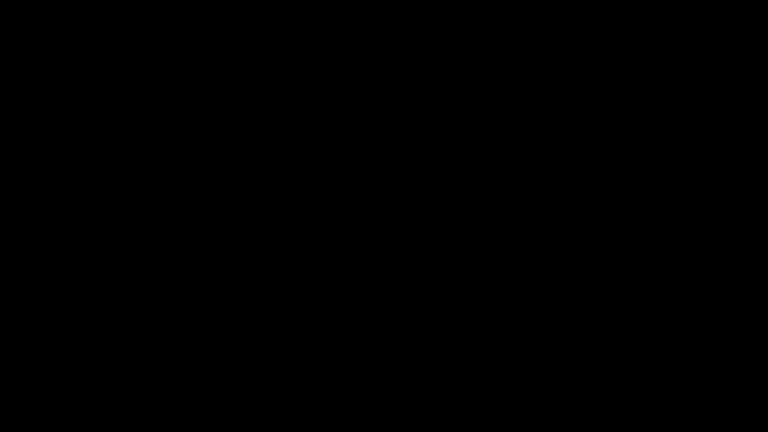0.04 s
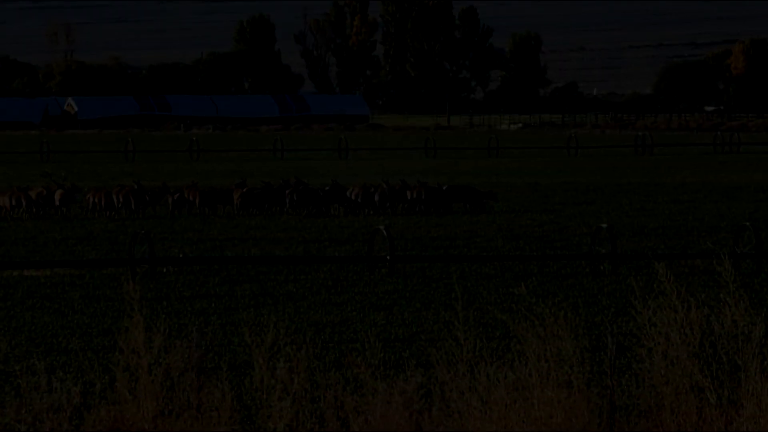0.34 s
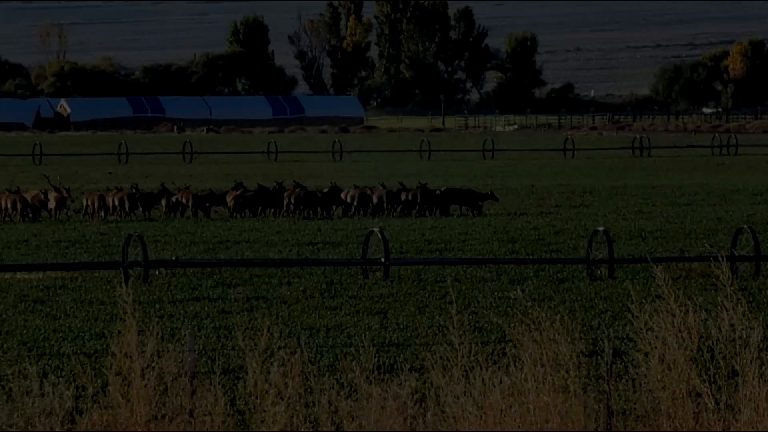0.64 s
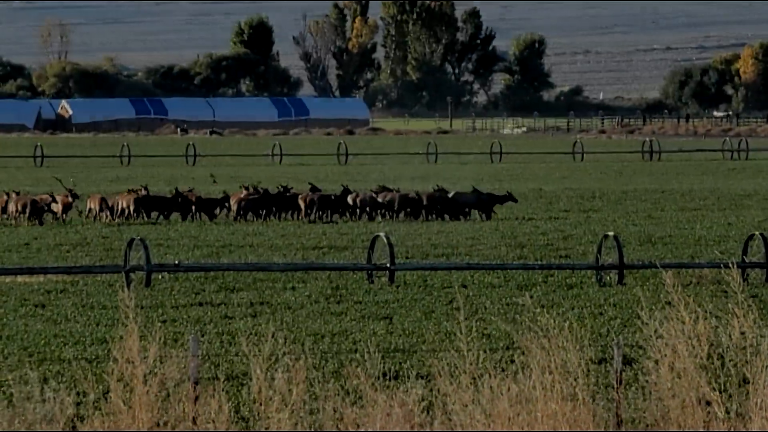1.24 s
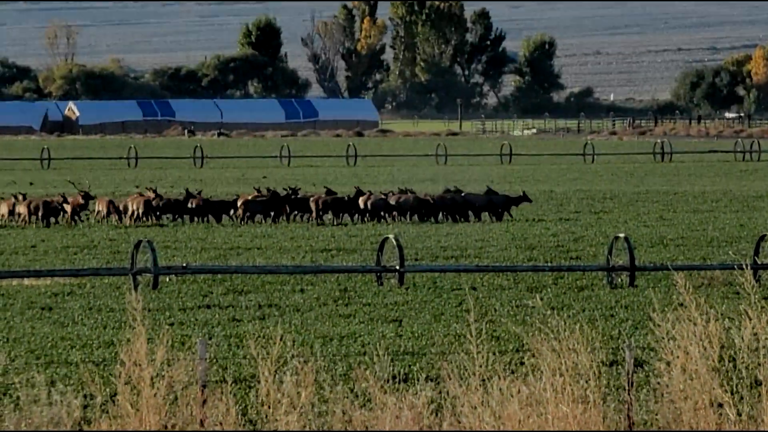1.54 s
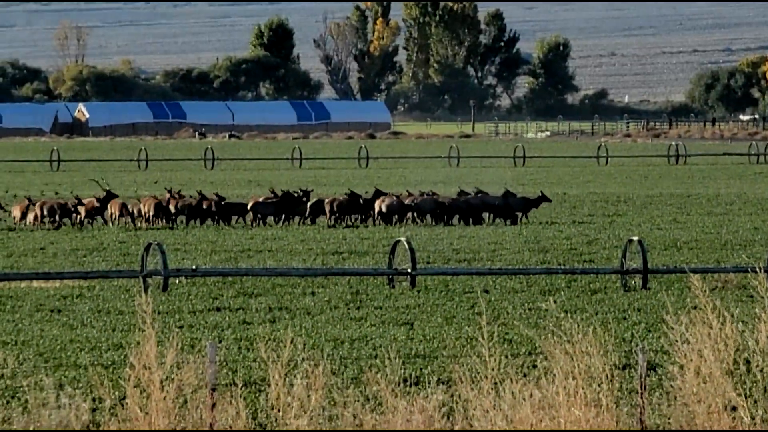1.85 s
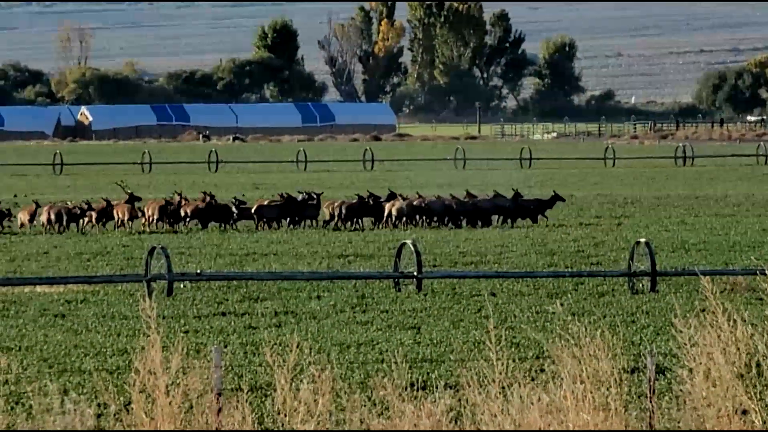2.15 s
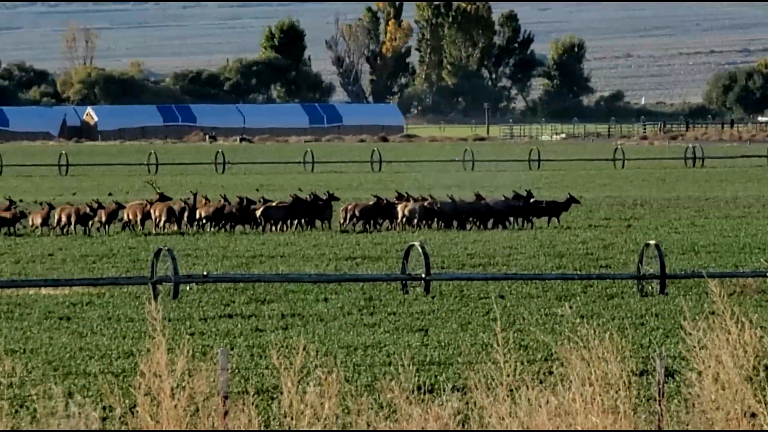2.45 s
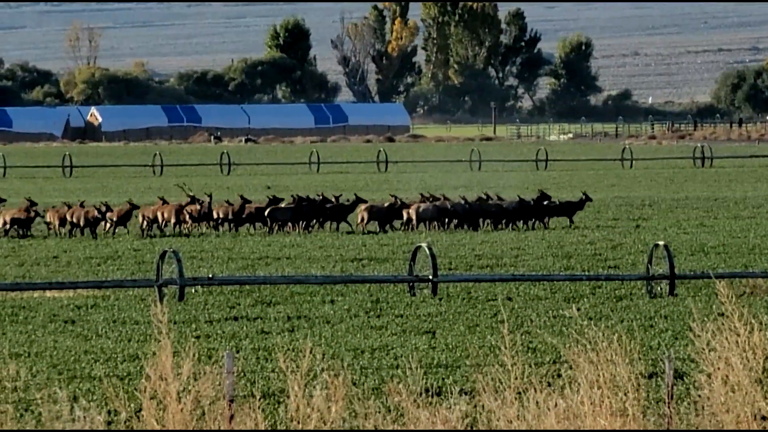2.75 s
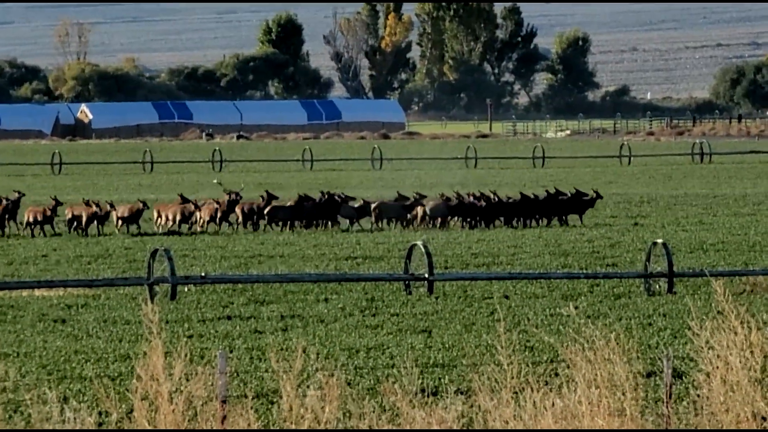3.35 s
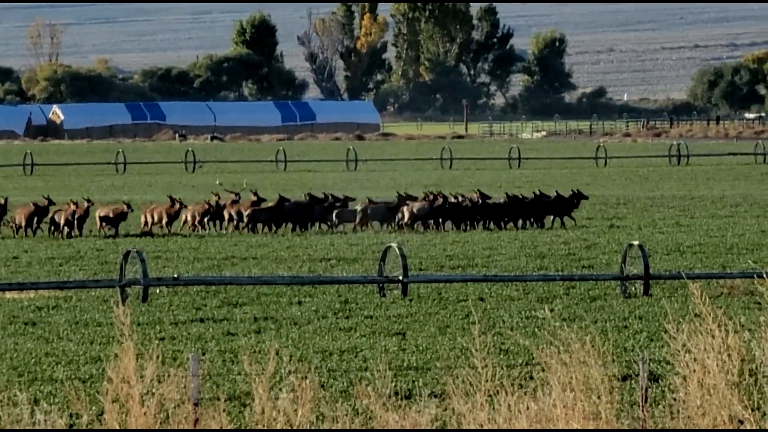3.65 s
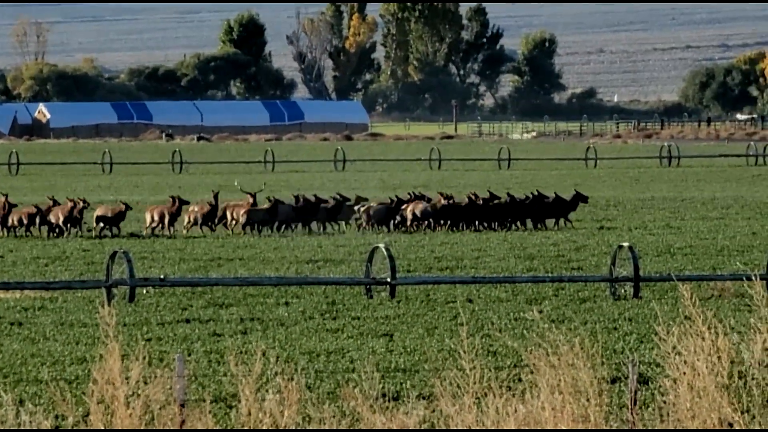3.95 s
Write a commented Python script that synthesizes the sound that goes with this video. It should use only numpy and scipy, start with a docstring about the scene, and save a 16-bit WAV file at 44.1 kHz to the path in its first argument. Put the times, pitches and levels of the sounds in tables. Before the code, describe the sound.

A distant idling engine fades in and hums steadily outdoors, mixed with low wind and a soft hiss. Near the start the microphone is bumped softly twice and gives a few faint clicks and rustles.

```python
"""An open field, with an engine idling some way off in light wind.
The harmonics of the engine's cycle make a low throb, and its narrow noise bands a wavering drone.
A rumble of wind and exhaust and a soft rush pulse with the firings, under a hiss and a thin whine.
Handling draws clicks and faint rustles from the camera's resonant body, and bumps it twice.
The whole scene fades in at the start."""
import sys
import numpy as np
from scipy import signal
from scipy.fft import rfft, irfft
from scipy.io import wavfile
from scipy.ndimage import uniform_filter1d

SR = 44100
rng = np.random.default_rng(int(sys.argv[2]) if len(sys.argv) > 2 else 0)


def file_out(sig):
    """Save sig as 16-bit WAV at sys.argv[1]."""
    # one column per channel
    cols = np.atleast_2d(sig).T
    # limit, then scale
    lim = np.clip(cols, -1, 1)
    pcm = np.round(lim * 32767).astype(np.int16)
    wavfile.write(sys.argv[1], SR, pcm)


N = 176400

CYCLE_HZ, FIRINGS_PER_CYCLE = 6.21, 6
SPEED_WANDER, WANDER_HZ = 0.0036, 1.38  # rms fraction of the engine's speed, bandwidth of its drift


def amp(db):
    """Amplitude ratio of a level in decibels."""
    return 10 ** (np.asarray(db) / 20)


def unit(x):
    """Normalisation to rms 1."""
    return x / np.sqrt(np.mean(x ** 2) + 1e-30)


def read(points, hz):
    """Interpolation of a table on a logarithmic frequency axis."""
    f, value = np.transpose(points)
    return np.interp(np.log(hz + 1), np.log(f + 1), value)


def envelope(points):
    """Gain over time, interpolated in decibels between rows of t/s, level/dB."""
    return amp(np.interp(np.arange(N) / SR, *np.transpose(points)))


def add(mix, start_s, sound):
    """Superposition of a sound on the mix from a given time."""
    part = mix[:, round(start_s * SR):][:, :sound.shape[-1]]
    part += sound[..., :part.shape[1]]


def drift(rate_hz):
    """Slow random fluctuation: low-passed Gaussian noise of rms 1."""
    hz = np.fft.rfftfreq(N, 1 / SR)
    lowpass = np.exp(-(hz / rate_hz) ** 2) * (hz > 0)
    return unit(irfft(rfft(rng.standard_normal(N)) * lowpass, N))


def pair(a, b, correlation):
    """Sum and difference of two independent signals give a left and right of set correlation."""
    c = np.clip(correlation, -1, 1)
    mid, side = a * np.sqrt((1 + c) / 2), b * np.sqrt((1 - c) / 2)
    return np.array([mid + side, mid - side])


def noise_field(density, patch_db):
    """Partially coherent noise at two microphones, its level varying in time-frequency patches."""
    # likeness of left and right: f/Hz, coherence
    coherence = [(40, 0.86), (160, 1), (300, 0.75), (450, 0.75), (600, 0.42), (860, 0.19), (1120, 0.06),
                 (1320, 0), (1480, 0.36), (1720, .78), (2000, .58), (2200, 0.058)]
    # left minus right: f/Hz, level/dB
    balance = [(250, 0), (400, -2.5), (600, -0.5), (930, -7), (1150, 1), (1470, 2.5), (1800, 3), (2200, 0),
               (2900, 2.5), (4150, -3.5), (5300, 9), (6150, -4.5), (7300, 8), (8500, 1), (10200, 1.5),
               (12500, -0.5)]
    # later arrival on the left: f/Hz, phase/rad
    lag = [(480, 0), (750, 0.24), (900, 1.8), (1340, 1.9), (1460, 0.82), (1560, -.4), (1700, -1.56),
           (2000, -1.94)]
    hz = np.fft.rfftfreq(N, 1 / SR)
    cells = signal.stft(rng.standard_normal((2, N)), nperseg=512)[2]
    patches = uniform_filter1d(rng.standard_normal(cells.shape[1:]), size=12, axis=1)  # along time
    patches = unit(uniform_filter1d(patches, size=6, axis=0))  # along frequency
    a, b = rfft(signal.istft(cells * amp(patch_db * patches))[1][:, :N])
    side_gain = amp(np.outer([.5, -.5], read(balance, hz)))
    side_phase = np.exp(-1j * np.outer([.5, -.5], read(lag, hz)))
    spectrum = pair(a, b, read(coherence, hz)) * side_gain * side_phase * amp(read(density, hz))
    return irfft(spectrum, N) * np.sqrt(SR / 2)


def engine_throb(cycles):
    """A periodic source radiates harmonics of its cycle; each wavers in level on its way."""
    # engine orders: multiple of the cycle rate, level/dB
    orders = [(3, -50), (4, -55.5), (6, -48), (8, -59.5), (12, -58), (15, -66), (18, -54), (20, -56),
              (21, -60), (22, -55.5), (24, -57.5), (27, -59.5)]
    # swell of all the orders: t/s, level/dB
    swell = [(0, 0.5), (1.1, -2.5), (1.95, 1.5), (2.5, -1.1), (3.9, 1)]
    waver_db, lag_rad = 1.5, np.array([[0.23], [0]])  # the left lags
    out = np.zeros((2, N))
    for order, db in orders:
        peak = np.sqrt(2) * amp(db + waver_db * drift(WANDER_HZ))
        out += peak * np.sin(2 * np.pi * (order * cycles + rng.random()) - lag_rad)
    return out * envelope(swell)


def engine_drone():
    """Narrow-band noise is heard as unsteady tones; these swell and sink together."""
    # bands of the drone: f/Hz, width/Hz, level/dB, left-right correlation
    bands = [(226.4, 2.9, -68, -.2), (258.6, 4.8, -63, 0.52), (295, 8.4, -58.5, 0.98),
             (373.6, 6.8, -69, 0.23), (447.6, 5.4, -73.5, 0.54), (595.4, 9.7, -72.5, 0.69),
             (656, 18, -79.5, 0.87), (747, 19, -77, 0.34), (810, 12, -78, 0.99), (977.7, 12, -79.5, 0.5)]
    # swell of all the bands: t/s, level/dB
    swell = [(0, -3.5), (.65, 3.5), (1.2, -4), (1.6, 1.5), (1.85, 3.5), (2.2, 2.5), (2.55, -0.5), (3.1, 0),
             (3.95, 2)]
    hz, out = np.fft.rfftfreq(N, 1 / SR), np.zeros((2, N))
    for centre, width, db, correlation in bands:
        lorentzian = 1 / (1 + ((hz - centre) / width * 1.52) ** 2)
        a, b = irfft(rfft(rng.standard_normal((2, N))) * lorentzian, N)
        out += amp(db) * pair(unit(a), unit(b), correlation)
    return out * envelope(swell)


def whine():
    """A thin, nearly pure tone, almost in antiphase at the two microphones, and its octave."""
    pitch_hz = 915 * (1 + 0.00052 * drift(rate_hz=2.4))
    phase = 2 * np.pi * np.cumsum(pitch_hz) / SR + np.array([[0], [3.16]])
    return np.sqrt(2) * (amp(-78.5) * np.sin(phase) + amp(-83.5) * np.sin(2 * phase))


def rumble(firing):
    """Low-frequency noise of wind and exhaust, amplitude-modulated at the firing rate."""
    # spectral density: f/Hz, level/dB in a 1 Hz band
    density = [(15, -96.5), (22, -67), (60, -69.5), (100, -69), (135, -68.5), (185, -70), (210, -78),
               (290, -77), (340, -80.5), (430, -89), (650, -96), (1200, -115), (3000, -160)]
    # swell of the rumble: t/s, level/dB
    swell = [(0, -0.5), (.85, .5), (1.2, -0.3), (2.15, 1.5), (3, -0.6), (3.9, .5)]
    return noise_field(density, patch_db=1.0) * (1 + 0.2 * firing) * envelope(swell)


def rush(firing):
    """Distant mid-frequency noise, weakly amplitude-modulated at the firing rate."""
    # spectral density: f/Hz, level/dB in a 1 Hz band
    density = [(100, -90.5), (400, -92), (560, -89.5), (760, -94), (870, -99), (1000, -94.5), (1290, -98),
               (1380, -96), (1620, -94), (1850, -97.5), (2000, -100), (2070, -111), (2500, -127),
               (4000, -160)]
    # swell of the rush: t/s, level/dB
    swell = [(0, -1.3), (.5, 0.5), (1.6, .3), (2.2, -0.7), (3.2, 0.8), (4, -1)]
    return noise_field(density, patch_db=1.73) * (1 + 0.065 * firing) * envelope(swell)


def hiss():
    """Broadband treble noise that rises briefly, then slowly sinks."""
    # spectral density: f/Hz, level/dB in a 1 Hz band
    density = [(1500, -114), (2400, -110.5), (3200, -107.3), (3700, -110), (4250, -111), (4600, -114.5),
               (5400, -112.3), (5850, -115.8), (6100, -110.2), (6350, -110), (6750, -118), (7700, -119),
               (9400, -126), (10200, -122), (10750, -127), (11500, -119.3), (14500, -119.8), (16000, -124)]
    # swell of the hiss: t/s, level/dB
    swell = [(0, -0.5), (.4, 1.5), (1.1, 0.5), (2.2, 0), (3.9, -0.95)]
    return noise_field(density, patch_db=1) * envelope(swell)


def camera_scrapes():
    """Short bursts of friction noise excite the damped modes of the camera body."""
    # modes of the body: f/Hz, T60/s, level/dB
    modes = [(2470, 0.048, -23), (3050, .035, -24), (4340, .075, -17.5), (5380, .04, -20),
             (6200, .025, -25)]
    # exciting bursts: t/s, level/dB, f/Hz, width/octaves, rise/s, decay/s
    touches = [(.259, -63.5, 2450, 0.14, 0.0032, 0.0066), (.262, -70, 4330, .15, .002, .005),
               (.2995, -61, 4200, 0.79, 0.002, 0.012), (.42, -75, 4330, .15, 0.0033, .008),
               (.724, -75, 4330, 0.15, .004, 0.011), (0.881, -69, 2100, .5, .018, .02),
               (.911, -70, 3400, 0.45, 0.0026, 0.011), (1.2205, -60, 3400, 1.0, 0.0016, 0.0055),
               (1.367, -60.5, 1880, 0.2, 0.0019, 0.0085), (1.468, -60, 1490, 0.21, .002, .007),
               (1.527, -59.5, 1660, 0.066, 0.0052, 0.0074), (2.936, -69, 3200, 0.43, .002, .005)]
    out, t = np.zeros((2, N)), np.arange(8192) / SR
    hz = np.fft.rfftfreq(len(t), 1 / SR)
    ringing = np.zeros(len(t))
    for f, t60, db in modes:
        energy_norm = np.sqrt(4 * np.log(1000) / (t60 * SR))
        ringing += amp(db - 60 * t / t60) * np.cos(2 * np.pi * f * t) * energy_norm
    response = 1 + rfft(ringing)  # direct sound plus resonance
    for start_s, db, centre, octaves, rise, decay in touches:
        band = 1 / (1 + (np.log2((hz + 1) / centre) / octaves) ** 2)
        friction = unit(irfft(rfft(rng.standard_normal((2, len(t)))) * band))
        burst = np.minimum(t / rise, 1) * np.exp(-np.maximum(t - rise, 0) / decay)
        add(out, start_s, amp(db) * irfft(rfft(friction * burst) * response))
    return out


def camera_bumps():
    """A soft impact on the camera body sets off a heavily damped oscillation."""
    # impacts: t/s, level/dB, f/Hz
    bumps = [(0.3041, -29.5, 254), (.914, -33.5, 225)]
    out, t = np.zeros((2, N)), np.arange(8192) / SR
    rise_s = 0.0015
    pulse = t / rise_s * np.exp(1 - t / rise_s)
    for start_s, db, f in bumps:
        add(out, start_s, -amp(db) * pulse * np.sin(2 * np.pi * f * t))
    return out


def scene():
    """The sources superpose; one engine speed drives the orders and the pulsing of the noise."""
    cycles = np.cumsum(CYCLE_HZ * (1 + SPEED_WANDER * drift(WANDER_HZ))) / SR
    firing = np.cos(2 * np.pi * FIRINGS_PER_CYCLE * cycles)
    tones = engine_throb(cycles) + engine_drone() + whine()
    noise = rumble(firing) + rush(firing) + hiss()
    return tones + noise + camera_scrapes() + camera_bumps()


def record(dry):
    """A treble notch in the microphones' response, a linear fade-in, then a low-pass band limit."""
    notch_hz, width_hz, depth_db = 8670, 750, -20
    fade_s, fade_from_db, cutoff_hz = 1.25, -10.5, 15850
    hz = np.fft.rfftfreq(N, 1 / SR)
    notch = amp(depth_db * np.exp(-((hz - notch_hz) / width_hz) ** 2))
    heard = irfft(rfft(dry) * notch, N)
    fade = np.interp(np.arange(N) / SR, [0, fade_s], [amp(fade_from_db), 1])
    lowpass = signal.firwin(511, cutoff_hz, window=("kaiser", 9), fs=SR)
    return signal.oaconvolve(heard * fade, lowpass[None], "same")


dry = scene()
out = record(dry)
file_out(out)
```